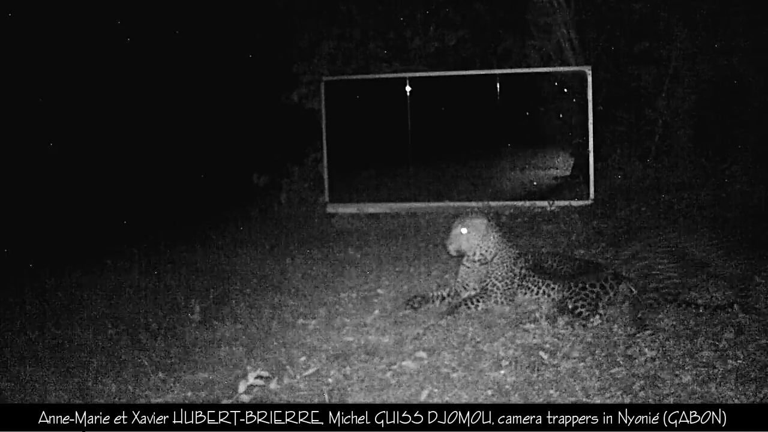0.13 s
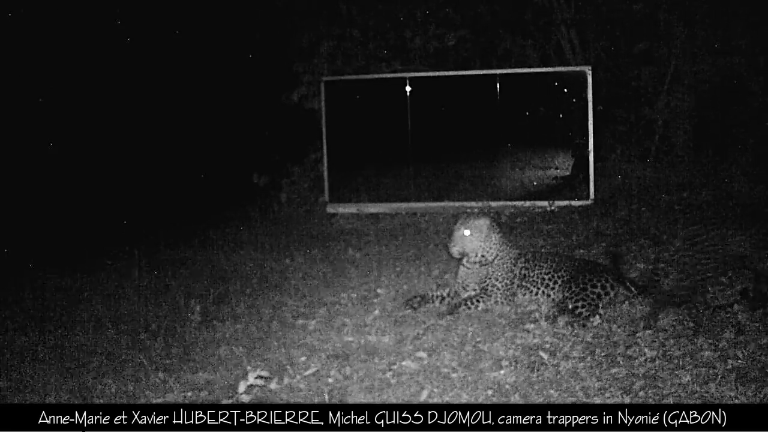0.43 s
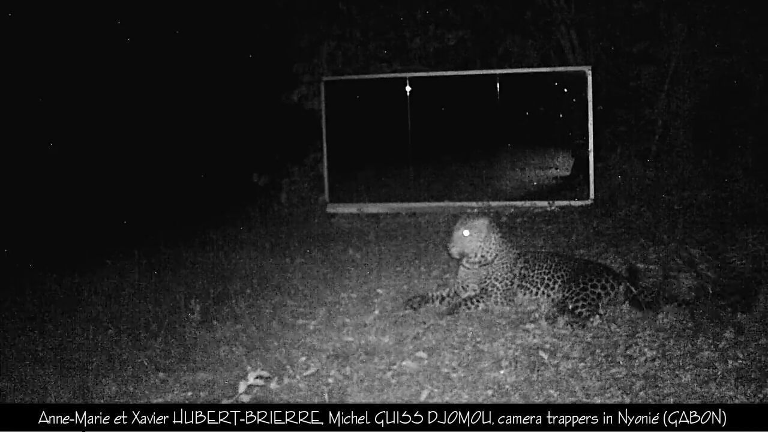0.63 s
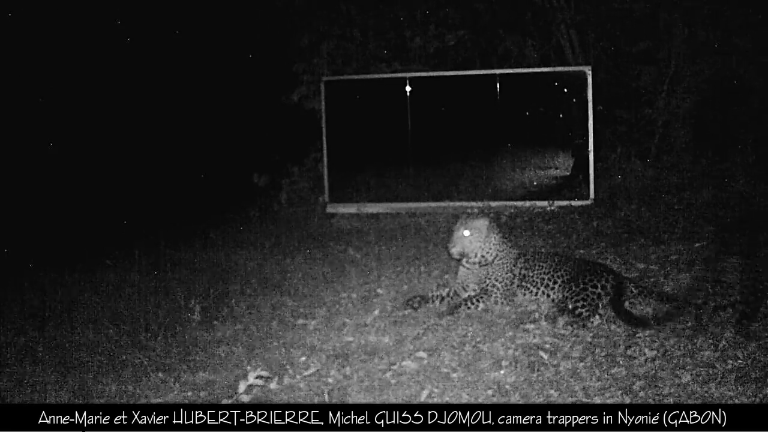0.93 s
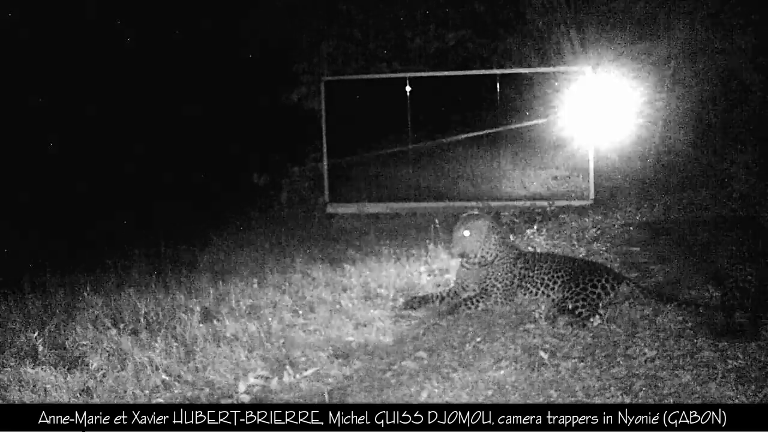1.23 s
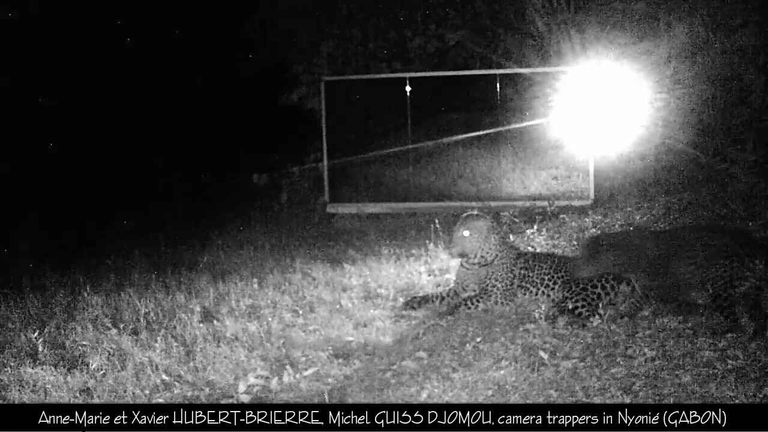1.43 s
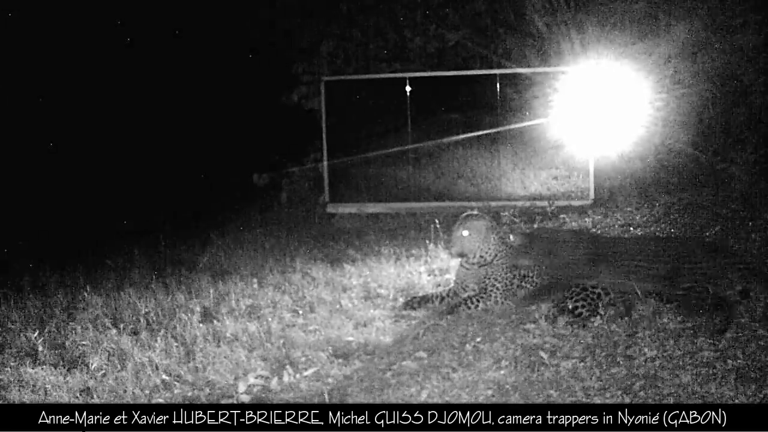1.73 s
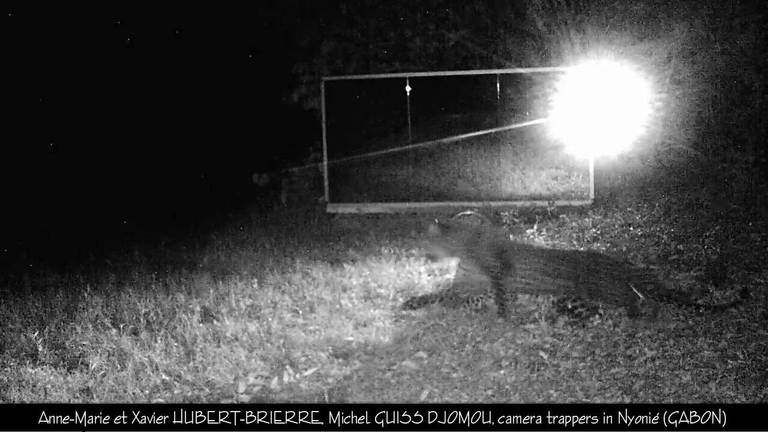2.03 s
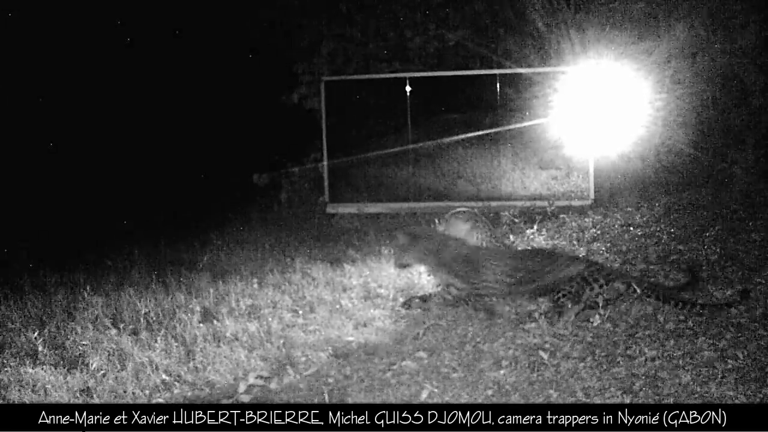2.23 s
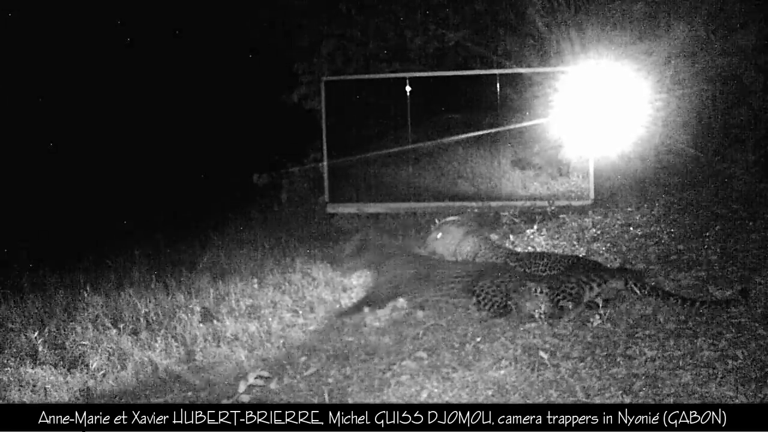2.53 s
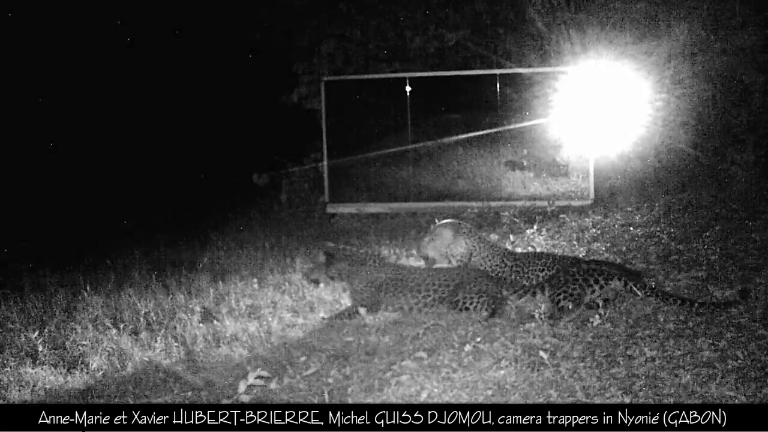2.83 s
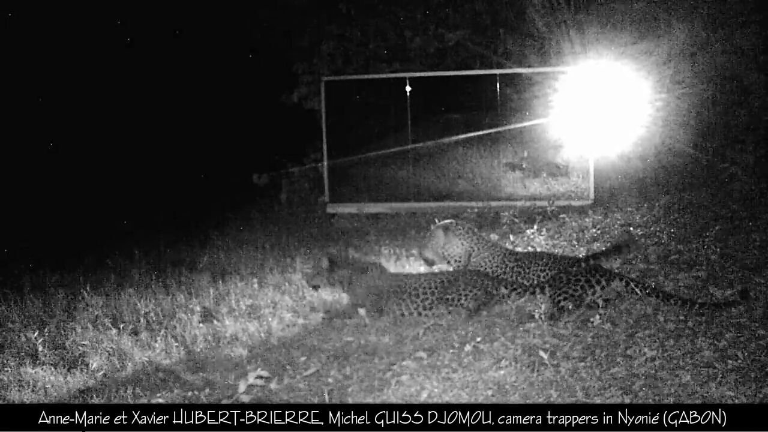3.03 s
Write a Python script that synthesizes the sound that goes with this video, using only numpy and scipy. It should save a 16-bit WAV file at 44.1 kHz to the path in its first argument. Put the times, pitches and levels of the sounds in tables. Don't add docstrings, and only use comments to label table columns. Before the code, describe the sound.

Slow, pulsing growls from two leopards grow louder and rougher, peak in a rasping snarl, then fade; crickets chirp throughout, dry leaves crackle and twigs snap, outdoors at night on a coarse recorder with slight doubling.

```python
import sys
import numpy as np
from scipy import signal
from scipy.fft import rfft, irfft, next_fast_len
from scipy.io import wavfile
from scipy.ndimage import map_coordinates

SR = 44100
rng = np.random.default_rng(int(sys.argv[2]) if len(sys.argv) > 2 else 0)


def gain_from_decibels(decibels):
    exponent = np.asarray(decibels, float) / 20
    return 10 ** exponent


def generate_wav(sig):
    pcm = np.round(np.clip(np.atleast_2d(sig).T, -1, 1) * 32767).astype(np.int16)
    wavfile.write(sys.argv[1], SR, pcm)


N = 141120


def unit(x):
    return x / np.sqrt(np.mean(x ** 2) + 1e-20)


def filtered(x, response):
    size = next_fast_len(N + SR // 2)
    return irfft(rfft(x, size) * response(np.fft.rfftfreq(size, 1 / SR)), size)[..., :N]


def resonances(peaks):
    def response(f):
        return sum((-1) ** k * gain_from_decibels(db) * 1j * f * width / (hz * hz - f * f + 1j * f * width)
                   for k, (hz, width, db) in enumerate(peaks))
    return response


def colour(points):
    hz, db = np.transpose(points)
    return lambda f: gain_from_decibels(np.interp(np.log(f + 1), np.log(hz), db))


def lowpass(order, hz):
    return lambda f: signal.freqs(*signal.butter(order, hz, analog=True), f)[1]


def ticks(times_s, gains):
    places = np.clip(np.round(times_s * SR).astype(int), 0, N - 1)
    return np.bincount(places, gains, N)


def grains(rate_hz, spread_db):
    happens = rng.random(N) < rate_hz / SR
    sign, size = rng.standard_normal((2, N))
    return happens * np.sign(sign) * gain_from_decibels(spread_db * size)


def level(rows):
    return gain_from_decibels(np.interp(np.arange(N) / SR, *np.transpose(rows)))


def swells(rows):
    t = np.arange(N) / SR
    return sum(gain_from_decibels(db) * np.cos(np.pi / 2 * np.clip((t - s) / (1.5 * half), -1, 1)) ** 2
               for s, half, db in rows)


def wings(peaks):
    skirt_hz = 810
    centre_hz = np.mean(peaks, 0)[0]
    return lambda f: resonances(peaks)(f) * resonances([(centre_hz, skirt_hz, 0)])(f) ** 2


# time_s, level_db
CHORUS = [(0.0, -28.5), (0.38, -29), (1.16, -30), (1.51, -30.5), (1.89, -29), (2.01, -25.5), (2.4, -30.5),
          (2.58, -24.5), (2.7, -26), (2.99, -29.5), (3.2, -34)]
# pitch_hz, width_hz, level_db
CHORUS_WINGS = [(2173, 143, -11.5), (2232, 32.3, -5), (2346.5, 40, 2.5), (2472.5, 113, -3.5)]


def cricket_chorus():
    return unit(filtered(grains(rate_hz=790, spread_db=-1.5), wings(CHORUS_WINGS))) * level(CHORUS)


# centre_s, half_length_s, level_db
CHIRPS = [(.17, 0.14, -28.5), (.5, 0.1, -30.5), (.78, 0.095, -28), (.99, 0.073, -30), (1.27, 0.096, -30),
          (1.6, 0.086, -35), (1.85, 0.012, -34.5), (2.05, 0.095, -31.5), (2.4, 0.093, -27.5),
          (2.6, 0.07, -25), (2.78, 0.093, -29.5), (2.91, 0.09, -36), (3.11, 0.1, -35)]
# pitch_hz, width_hz, level_db
CHIRP_WINGS = [(2799, 88, -9.5), (2919, 18.7, 0), (3031, 42, -9)]


def near_cricket():
    rate_hz, jitter_strokes, spread_db, chirp_db, rest_db = 200, .8, 1.3, -2, -42.5
    t = np.arange(N) / SR
    count = N // 100
    chance = rng.standard_normal((count, 2))
    times_s = (np.arange(count) + jitter_strokes * chance[:, 0]) / rate_hz
    strokes = ticks(times_s, gain_from_decibels(spread_db * chance[:, 1]))
    strokes = strokes * (t < t[-1])
    return unit(filtered(strokes, wings(CHIRP_WINGS))) * (gain_from_decibels(chirp_db) * swells(CHIRPS) + gain_from_decibels(rest_db))


# time_s, level_db
SHRILL = [(0, -88.5), (.5, -63.5), (.8, -47.5), (1.1, -50), (1.6, -57), (1.9, -57.5), (2.9, -79.5),
          (3.2, -60.5)]
# pitch_hz, width_hz, level_db
SHRILL_WINGS = [(5240, 1200, 0)]


def shrill_haze():
    noise = rng.standard_normal(N)
    return unit(filtered(noise, lambda f: resonances(SHRILL_WINGS)(f) ** 2)) * level(SHRILL)


# pitch_hz, level_db
AIR = [(10, -5), (40, 0.5), (100, -6.5), (300, -17.5), (800, -20), (1900, -14), (3500, -24.5),
       (5400, -24.5)]


def air():
    level_db, wobble_db, sway_hz = -47, -3, 9
    sway = map_coordinates(rng.standard_normal(40), [np.arange(N) * sway_hz / SR])
    return gain_from_decibels(level_db + wobble_db * sway) * unit(filtered(rng.standard_normal(N), colour(AIR)))


CHEST_HZ = 650


def throat_ring(hz, width_hz):
    if hz < CHEST_HZ:
        return lambda f: resonances([(hz, width_hz, 0)])(f) * resonances([(hz, 4 * width_hz, 0)])(f)
    return lambda f: resonances([(hz, 2.2 * width_hz, 0)])(f) ** 2


def throat_shape(peaks, progress):
    soft_hz = 3500

    def response(f):
        rings = sum(gain_from_decibels(db) * throat_ring(first + progress * (last - first), width)(f)
                    for first, last, width, db in peaks)
        return rings / (1 + 1j * f / soft_hz) ** 2
    return response


# time_s, level_db
MOUTH = [(.83, -10), (.93, 1), (1.12, 8.5), (1.25, -10.5), (1.55, -0.5), (1.7, 2), (1.82, -28), (1.95, -5),
         (2.15, -3), (2.3, 2), (2.44, 3), (2.54, 1.5), (2.6, 4), (2.67, -12.5), (2.72, 7.5), (2.8, -7),
         (2.95, 1), (3.05, -18.5)]


def growl(rows, throat, breath_db, rasp_share):
    jitter_s, scatter_db = .0007, 1
    puff_s, gated_share = .012, .55
    edge_s, fall_s, rasp_s = .03, .025, .0018
    t = np.arange(N) / SR
    s, number, db = np.transpose(rows)

    whole = np.arange(round(number[-1]) + 1)
    chance = rng.standard_normal((len(whole), 2))
    times_s = np.interp(whole, np.round(number), s) + jitter_s * chance[:, 0]
    flaps = ticks(times_s, gain_from_decibels(np.interp(times_s, s, db) + scatter_db * chance[:, 1]))

    middle = throat_shape(throat, .5)
    peak = np.abs(filtered(ticks(np.zeros(1), np.ones(1)), middle)).max()
    clean = flaps / peak

    puffs = signal.lfilter([1], [1, -np.exp(-1 / (puff_s * SR))], flaps)
    inside = np.clip((t - s[0]) / edge_s + 1, 0, 1) * np.clip((s[-1] - t) / fall_s + 1, 0, 1)
    leak = inside ** 2 * gain_from_decibels(np.interp(t, s, db))
    flow = gated_share * puffs + (1 - gated_share) * leak
    breath_noise, rasp_noise = rng.standard_normal((2, N))
    breath = gain_from_decibels(breath_db) * flow * breath_noise / np.std(filtered(breath_noise, middle))

    bump_t = t[:SR // 40]
    bump = bump_t * np.exp(-bump_t / rasp_s)
    rasp = rasp_noise * signal.fftconvolve(flaps, bump / np.linalg.norm(bump))[:N] / peak
    mouth_drive = ((1 - rasp_share) * clean + rasp_share * rasp + breath) * level(MOUTH)

    chest = [p for p in throat if p[0] < CHEST_HZ]
    mouth = [p for p in throat if p[0] >= CHEST_HZ]
    progress = np.clip((t - s[0]) / (s[-1] - s[0]), 0, 1)
    voice = np.zeros(N)
    for drive, peaks in [(clean + breath, chest), (mouth_drive, mouth)]:
        if peaks:
            for stage in (0, .5, 1):
                fade = np.clip(1 - 2 * abs(progress - stage), 0, 1)
                voice += filtered(drive * fade, throat_shape(peaks, stage))
    return voice


# time_s, flap_number, peak_db
PURR = [(.018, 0, -33), (.066, 1, -33), (.252, 4, -36), (.31, 5, -37), (.457, 8, -40), (.632, 11, -40)]
OPEN = [(.829, 0, -27), (.886, 1, -31), (.916, 2, -29), (1.005, 4, -26), (1.049, 5, -24), (1.134, 7, -25),
        (1.178, 8, -22), (1.231, 9, -24), (1.341, 11, -27)]
DEEP = [(1.479, 0, -34), (1.556, 2, -28), (1.595, 3, -25), (1.677, 5, -22), (1.751, 7, -22),
        (1.792, 8, -19), (1.853, 9, -25), (1.945, 11, -23), (2.029, 13, -22), (2.095, 15, -23),
        (2.163, 17, -20), (2.197, 18, -21), (2.233, 19, -31), (2.287, 20, -32)]
SNARL = [(2.322, 0, -22), (2.355, 1, -18), (2.372, 2, -21), (2.414, 3, -15), (2.435, 4, -10),
         (2.454, 5, -16), (2.478, 6, -17), (2.495, 7, -13), (2.52, 8, -14)]
BARK = [(2.574, 0, -25), (2.591, 1, -18), (2.634, 2, -16), (2.666, 3, -17), (2.711, 4, -15),
        (2.737, 5, -13), (2.783, 6, -18), (2.808, 7, -27)]
TAIL = [(2.912, 0, -37), (2.953, 1, -29), (3.074, 4, -26), (3.193, 7, -32)]
# first_hz, last_hz, width_hz, level_db
PURR_THROAT = [(90, 270, 35, -20.5), (199, 179, 37, -6)]
OPEN_THROAT = [(104, 88, 56, -5.5), (180, 200, 45, -2.5), (380.6, 365, 30.4, 5), (770, 1100, 23, -22),
               (870, 864, 29, -5.5), (1960, 1820, 150, -17.5)]
DEEP_THROAT = [(95, 90, 23.3, -8.5), (209.7, 202, 26.7, 2), (474, 400, 53, -22), (650.5, 723, 22, -15),
               (1890, 2900, 53, -6.5), (2310, 2120, 160, -4)]
SNARL_THROAT = [(104, 117, 40, -8.5), (231, 207, 30, 0.5), (567, 394, 23, -10), (780, 860, 33, -18),
                (1076, 976, 69, -5.5), (1286, 1303, 98, -9), (1634, 1620, 170, -13), (1920, 1860, 65, 0.5),
                (2080, 2180, 217, 0.5), (3960, 4800, 540, -17.5)]
BARK_THROAT = [(104, 130, 40, -11), (217.6, 176, 37, -3), (380, 330, 32.5, -4.5), (887, 870, 16.3, -10.5),
               (1273, 2100, 800, -29), (1920, 2200, 140, -14.5), (2150, 2150, 110, -10)]
TAIL_THROAT = [(100, 78, 38, -15.5), (193.6, 200, 22.2, -2.5), (454, 520, 22, -19), (712, 630, 27, -11)]
# flaps, throat, breath_db (re flaps), rasp_share (0-1)
GROWLS = [(PURR, PURR_THROAT, -24, .2), (OPEN, OPEN_THROAT, -20, .1), (DEEP, DEEP_THROAT, -19, .15),
          (SNARL, SNARL_THROAT, -17, .85), (BARK, BARK_THROAT, -15, .3), (TAIL, TAIL_THROAT, -16, .2)]
VOICE_DB = [0.08, 2.9, 9.07, 8.56, 6.8, 2.4]


def big_cats():
    lips_hz = 4700
    voices = sum(gain_from_decibels(db) * growl(*turn) for turn, db in zip(GROWLS, VOICE_DB))
    return filtered(voices, lowpass(8, lips_hz))


# centre_s, half_length_s, level_db
RUSTLES = [(.12, 0.055, -39), (.3, 0.05, -43), (.39, 0.1, -49.5), (.77, 0.025, -37), (1.17, 0.02, -35.5),
           (1.37, 0.037, -42), (1.45, 0.1, -42.5), (1.72, 0.075, -45), (1.83, 0.032, -36),
           (2.06, 0.071, -36.5), (2.14, 0.11, -37), (2.48, 0.055, -51.5), (2.6, 0.14, -40.5),
           (2.73, 0.15, -67.5)]
# pitch_hz, level_db
LEAVES = [(500, -64), (900, -20.5), (1500, -9.5), (2200, -16), (3500, -21.5), (5400, -20.5)]


def leaves():
    crackle = grains(rate_hz=900, spread_db=4) + 0.084 * rng.standard_normal(N)
    return unit(filtered(crackle, colour(LEAVES))) * swells(RUSTLES)


# time_s, peak_db, ring_hz, width_hz
SNAPS = [(.2995, -6, 1500, 380), (1.177, -7, 1600, 600), (1.356, -19, 1500, 500), (2.132, -24, 1100, 300),
         (2.7118, -1, 2200, 60), (2.7355, -18, 2300, 400), (2.571, -23, 1200, 150), (2.787, -24, 1550, 120)]


def twigs():
    crack_hz, crack_width_hz, crack_db, wood_hz = 3230, 2600, -14.5, 4300
    t = np.arange(SR // 20) / SR
    noise = rng.standard_normal(N)
    crack = unit(filtered(noise, lambda f: resonances([(crack_hz, crack_width_hz, 0)])(f) ** 2))
    burst = gain_from_decibels(crack_db) * t / .0005 * np.exp(-t / .0008)
    out = np.zeros(N)
    for s, db, hz, width_hz in SNAPS:
        start = round(s * SR)
        ring = np.sin(2 * np.pi * hz * t) * np.exp(-np.pi * width_hz * t)
        ring = ring * (1 - np.exp(-t * hz)) ** 2
        out[start:][:len(t)] += gain_from_decibels(db) * (ring + burst * crack[start:][:len(t)])
    return filtered(out, lowpass(6, wood_hz))


def forest(near):
    level_db, t60_s = -9, .12
    t = np.arange(SR // 4) / SR
    tail = rng.standard_normal(len(t)) * gain_from_decibels(-60 * t / t60_s)
    return gain_from_decibels(level_db) * signal.fftconvolve(near, tail / np.linalg.norm(tail))[:N]


def scene():
    night = cricket_chorus() + near_cricket() + shrill_haze() + air()
    near = big_cats() + leaves() + twigs()
    return (night + near + forest(near))[None]


def low_pass(x):
    return signal.sosfilt(signal.butter(12, 17110, fs=SR, output="sos"), x)


def record(dry):
    early_s, early_db, early_hz = .0174, -4.5, 1770
    step, top_hz, roll_hz, offset = 4, 17110, 16000, .0076

    def twice(f):
        early = gain_from_decibels(early_db) / (1 + 1j * f / early_hz) ** 2 * np.exp(2j * np.pi * f * early_s)
        return (1 + early) * (f < SR / step / 2)

    both = filtered(dry[0], twice)
    joined = np.interp(np.arange(N), np.arange(0, N, step), both[::step])
    joined = filtered(joined, lambda f: (f < top_hz) / np.sqrt(1 + (f / roll_hz) ** 20))
    return low_pass(joined[None] + offset)


dry = scene()
out = record(dry)
generate_wav(out)
```